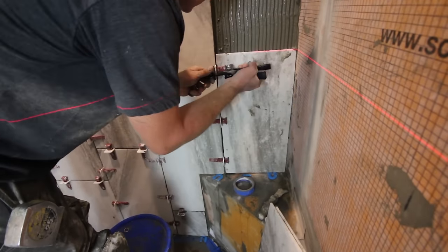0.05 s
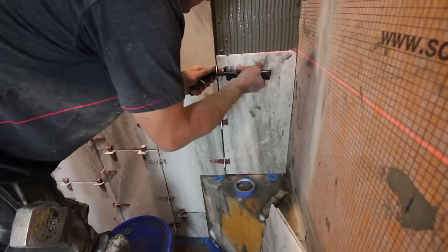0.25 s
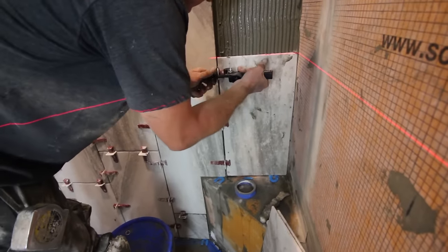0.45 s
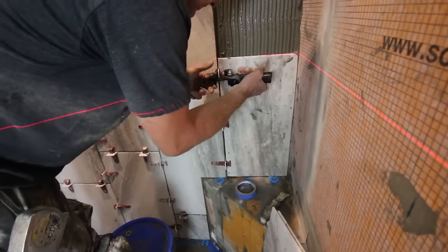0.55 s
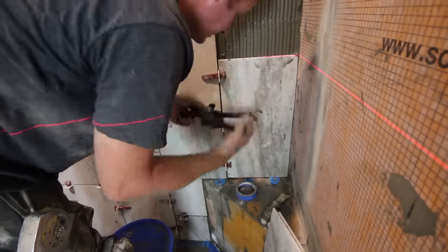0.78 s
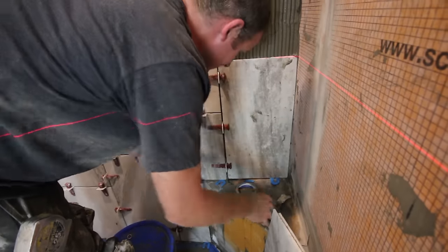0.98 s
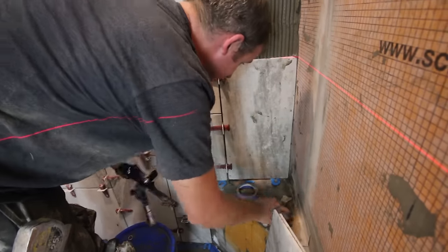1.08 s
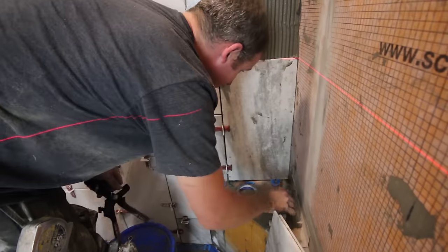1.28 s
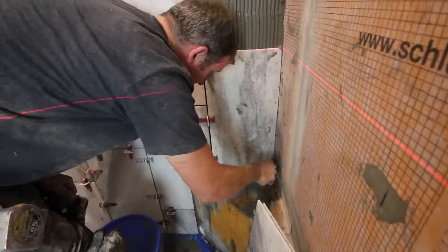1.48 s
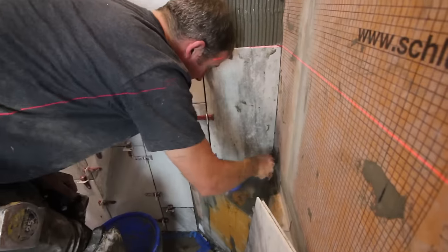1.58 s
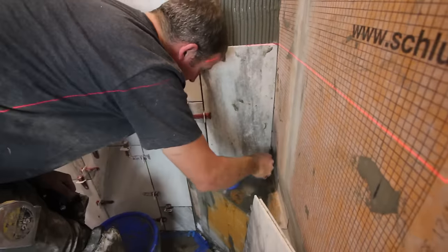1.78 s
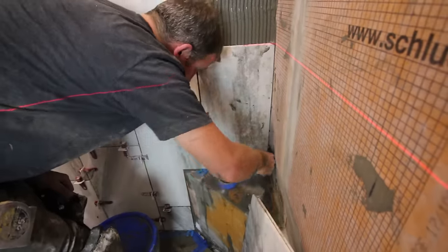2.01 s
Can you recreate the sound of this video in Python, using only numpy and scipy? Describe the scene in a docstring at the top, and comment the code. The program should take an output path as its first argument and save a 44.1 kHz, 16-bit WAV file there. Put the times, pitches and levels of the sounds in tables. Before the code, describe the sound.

Close to the microphone, a steel tool scrapes grittily between tiles with sharp clicks and a tiny squeak. A hand briefly rummages through hard bits, then hollow knocks and light clinks on tile follow, ringing in the tiled room.

```python
"""A steel hand tool clatters, scrapes, clinks and squeaks at a tile joint on a bathroom wall, close to
the microphone. After a pause a hand rummages among small hard pieces in a tray, then the tool knocks,
drags and clinks on a hollow tile. Each contact is a few milliseconds of crunching grit, treble first,
that rings short modes. The tiled room rings on behind, over faint room tone, and the loudest hits
overload the microphone."""
import sys
import numpy as np
from scipy import signal
from scipy.fft import rfft, irfft
from scipy.io import wavfile

SR = 44100
rng = np.random.default_rng(int(sys.argv[2]) if len(sys.argv) > 2 else 0)


def pcm_store(signal):
    """Save signal as 16-bit PCM."""
    levels = np.round(np.clip(np.atleast_2d(signal), -1, 1) * 32767)
    wavfile.write(sys.argv[1], SR, levels.astype(np.int16).T)


N = 90404

# spectrum of the room tone: (frequency [Hz], relative level [dB])
ROOM_TONE_SPECTRUM = [(30, 4), (341, -4), (546, -3), (1260, -4.5), (1820, -13.5), (2420, -11.5),
                      (15500, -30)]
# reverberation of the tiled room: (frequency [Hz], t60 [s], relative level [dB])
ROOM_DECAY = [(98, 0.38, -4.5), (405, 0.53, -3.5), (1540, 0.27, 2.5), (5190, 0.31, -0.5),
              (13380, 0.083, 1.5)]
# treble modes of the tool's steel: (frequency [Hz], gain [dB])
STEEL_MODES = [(4580, 1), (5400, -4.5), (6200, -13.5), (7200, -7.5), (7800, -3.5), (8650, -4.5),
               (11600, -2.5), (13800, -1.5), (14700, 0), (15650, 6)]
# light touches of the steel on the tile: (time [s], relative level [dB])
STEEL_CLINKS = [(1.532, -45.5), (1.559, -49), (1.605, -50), (1.635, -51), (1.647, -49), (1.655, -51),
                (1.697, -37), (1.887, -47), (1.892, -49), (1.906, -48), (2.01, -33), (2.016, -45),
                (2.03, -32)]
# modes of the tray, the hollow tile and the tool: (frequency [Hz], gain [dB], t60 [s])
TRAY_MODES = [(170, -8.5, 0.055), (354, -10, 0.077), (650, 6, 0.0203), (1000, 0, 0.018),
              (1410, -13.5, 0.00574), (2540, -6.5, 0.0153), (3570, 2.5, 0.017)]
TILE_MODES = [(160, 18.5, 0.077), (317, 16, 0.1435), (594, -1.5, 0.047), (1063, 2.5, 0.034),
              (1408, 5, 0.029), (2015, -6.5, 0.035), (2390, 3, 0.014), (3500, -9, 0.016),
              (4050, -1, 0.0044)]
TOOL_MODES = [(144, -3, 0.057), (271.7, -13.5, 0.052), (564.4, 5.5, 0.026), (1330, 18.5, 0.025),
              (1900, -7, 0.0061), (2355, 5, 0.028), (2692, 1.5, 0.025), (3290, -1, 0.028), (3856, 4, 0.019)]
# limits of the six bands of every contact and rub: (frequency [Hz])
BAND_EDGES_HZ = [70, 200, 430, 800, 1600, 4500, 16500]
# unresonant crunch beside the modes, band by band: (gain [dB])
CRUNCH_DB = [-8, -4, -3.5, -2.5, 1, 5.5]
# contacts: (time [s], level in each of the six bands over LEVEL_SPAN_S [dB], rise [s], decay [s])
TRAY_CONTACTS = [(1.056, -44, -58, -61.5, -57, -69, -65, 0.00081, 0.023),
                 (1.119, -67, -40.5, -42.5, -44.5, -57, -69, 0.00069, 0.016),
                 (1.152, -54, -66, -67, -36.5, -37.5, -53, 0.00065, 0.021),
                 (1.17, -63, -40.5, -40.5, -33.5, -45, -79, 0.001, 0.013),
                 (1.188, -50.5, -50, -46, -32, -38.5, -56, 0.00069, 0.01),
                 (1.215, -77, -55, -36, -34, -46, -66, 0.0033, 0.0054),
                 (1.243, -54, -36, -33, -23.5, -44, -44.5, 0.0015, 0.024),
                 (1.254, -64.5, -62, -27.5, -39, -27, -51, 0.0054, 0.015),
                 (1.282, -61, -68, -31, -31.5, -61, -48, 0.00054, 0.0054),
                 (1.293, -67.5, -43, -30, -34.5, -40, -68, 0.00077, 0.012)]
TILE_KNOCKS = [(1.5249, -43, -39.5, -25, -33.5, -22.5, -57, 0.00055, 0.0068),
               (1.541, -51.5, -34, -29.5, -50, -30.5, -74.5, 0.0004, 0.0084),
               (1.587, -36.5, -38, -29.5, -22, -24, -70, 0.00072, 0.012),
               (1.622, -65, -41, -34, -41, -32.5, -69, 0.00054, 0.0022),
               (1.66, -62, -65, -66, -63, -34, -65, 0.0026, 0.013),
               (1.6739, -30, -14.5, -23.5, -18, -27, -31.5, 0.0013, 0.0063),
               (1.719, -38, -54, -32.5, -31, -31, -78, 0.0018, 0.0037),
               (1.756, -73, -39, -41, -49, -35, -59, 0.00037, 0.007),
               (1.782, -71, -29, -36, -63, -43.5, -71, 0.00061, 0.01),
               (1.81, -42.5, -58, -33.5, -46, -44, -68, 0.0016, 0.0067),
               (1.823, -68, -33, -54, -38, -28, -54, 0.0019, 0.0027),
               (1.836, -44, -28.5, -27, -30.5, -37.5, -52, 0.00055, 0.0055),
               (1.844, -66, -61, -32, -34.5, -31.5, -45.5, 0.00085, 0.0074),
               (1.914, -51, -43, -46.5, -45, -40, -42, 0.00056, 0.0015),
               (1.933, -40, -29.5, -27, -29, -26, -33.5, 0.00074, 0.0039),
               (1.95, -48, -31.5, -46, -37, -35, -43, 0.00033, 0.0019),
               (2.043, -66, -53, -40, -43, -37, -35, 0.00078, 0.0066)]
TOOL_CLATTER = [(0.088, -19.5, -25, -31, -48.5, -47.5, -59.5, 0.00022, 0.011),
                (0.163, -38, -43.5, -58, -68, -49.5, -60, 0.00092, 0.0045),
                (0.175, -45, -40, -50, -76, -45, -53, 0.00035, 0.0057),
                (0.186, -57, -38.5, -52, -51, -37.5, -68, 0.004, 0.0064),
                (0.203, -49, -51, -45, -67, -51.5, -36.5, 0.0015, 0.015),
                (0.2314, -28.5, -23.5, -18.5, -20.5, -19, -25.5, 0.0012, 0.0056),
                (0.2617, -49, -26, -17, -13.5, -4.5, -10, 0.00088, 0.0033),
                (0.288, -51, -21.5, -29, -13, -20, -17.5, 0.00039, 0.011),
                (0.292, -33, -48, -21, -19, -24, -46, 0.001, 0.0026),
                (0.333, -43, -25, -28, -46, -24.5, -30, 0.0026, 0.0018),
                (0.337, -55, -51, -59, -19, -50, -25.5, 0.0005, 0.0067),
                (0.359, -56, -25.5, -32, -29, -57, -57, 0.0014, 0.013),
                (0.39, -31, -22, -21, -25.5, -25, -19.5, 0.0032, 0.0095),
                (0.417, -44, -35, -45, -32.5, -50, -45, 0.00072, 0.004),
                (0.444, -32, -22, -24, -61, -25.5, -20, 0.0021, 0.0087),
                (0.509, -58, -41, -52, -54, -29, -31, 0.0033, 0.015),
                (0.527, -46, -62, -55, -52, -36, -33.5, 0.0031, 0.013),
                (0.573, -72.5, -58, -45.5, -67, -69, -40, 0.00074, 0.0055),
                (0.597, -55, -39, -39, -54, -37.5, -33.5, 0.00078, 0.0068),
                (0.662, -67.5, -53, -59, -49.5, -47, -50.5, 0.00052, 0.0053)]
# rubbing between contacts: (time [s], level below 1600 Hz [dB], level above 1600 Hz [dB])
TRAY_RUB = [(1.04, -75, -65), (1.099, -60.5, -61), (1.163, -55, -54), (1.21, -53, -44), (1.24, -46, -54.5),
            (1.268, -44.5, -38.5), (1.311, -53.5, -48.5), (1.402, -67, -68)]
TILE_RUB = [(1.532, -49.5, -52), (1.581, -38, -46.5), (1.64, -51, -47), (1.7, -45, -39.5),
            (1.75, -59, -49.5), (1.8, -50, -56), (1.87, -47, -49.5), (1.92, -79, -45.5),
            (1.951, -48, -35.5), (2.05, -48.5, -41.5)]
JOINT_RUB = [(0.15, -79, -78), (0.191, -54, -49.5), (0.225, -56, -47.5), (0.28, -34, -33),
             (0.33, -40, -35.5), (0.38, -41.5, -40.5), (0.43, -33.5, -41), (0.49, -44, -39),
             (0.544, -49, -44), (0.6, -54, -48), (0.661, -60.5, -54.5), (0.75, -63.5, -63)]
# tone of the joint, the tray and the tile: (bass cut [Hz], treble roll-off [Hz])
TONE_HZ = [(78, 4700), (100, 3900), (125, 3100)]

STEEL_T60_CYCLES, STRIKE_SPREAD_DB = 85, 3
SNAP_DB, BASS_LAG_S, LEVEL_SPAN_S = 17, 0.0009, 0.009
CLUMP_DB, CLUMP_S = 2, 0.0048
RUB_RING_DB = [-21, -19.5]   # rubbing damps the modes (below, above 1600 Hz)


def from_db(db):
    """Decibels to gain."""
    return 10 ** (np.asarray(db) / 20)


def rms_one(x):
    """Scale to rms 1."""
    return x / np.sqrt(np.mean(x ** 2) + 1e-20)


def at_hz(table, hz, column=1):
    """Read a table on a log-frequency axis."""
    table = np.array(table)
    return np.interp(np.log(hz), np.log(table[:, 0]), table[:, column])


def room_tone():
    """Faint, steady background noise, strongest in the bass."""
    hz = np.maximum(np.arange(N // 2 + 1) * SR / N, 1)
    spectrum = rfft(rng.standard_normal(N)) * from_db(at_hz(ROOM_TONE_SPECTRUM, hz))
    return from_db(-58.5) * rms_one(irfft(spectrum, N))


def bathroom_reverb(direct, gap_s=0.0054):
    """Dense reflections off the tiles reach the microphone after a gap and die faster in the treble."""
    t, tail = np.arange(SR) / SR, 0
    for low in 60 * 2. ** np.arange(8):
        octave = signal.butter(2, [low, 2 * low], "band", fs=SR, output="sos")
        noise = signal.sosfilt(octave, rng.standard_normal(SR))
        hz = np.sqrt(2) * low
        tail = tail + noise * from_db(at_hz(ROOM_DECAY, hz, column=2) - 60 * t / at_hz(ROOM_DECAY, hz))
    return signal.fftconvolve(direct, tail * (t > gap_s) / np.sqrt(SR / 40))[:N]


def ring(force, hz, t60):
    """One decaying mode, driven by a force."""
    radius, angle = from_db(-60 / (max(t60, .002) * SR)), 2 * np.pi * hz / SR
    return signal.lfilter([0, np.sin(angle)], [1, -2 * radius * np.cos(angle), radius ** 2], force + 1e-18)


def grit(samples, per_s, spread_db):
    """Grains of uneven size breaking at random; rms 1."""
    sizes = from_db(spread_db * np.minimum(rng.exponential(1, samples), 4))
    signs = rng.choice([-1, 1], samples)
    return rms_one(sizes * signs * (rng.random(samples) < per_s / SR))


def body(modes, tone_hz, band, force, ring_db=0, spread_db=0):
    """One band of an object: grains crunch drily and ring its modes, unevenly if given a spread."""
    low, high = BAND_EDGES_HZ[band:band + 2]
    out = from_db(CRUNCH_DB[band]) * force * np.sqrt(SR / (high - low))
    for hz, db, t60 in modes:
        if low <= hz < high:
            gain = from_db(db + ring_db + spread_db * rng.standard_normal())
            out += gain * ring(force, hz, t60) / np.sqrt(t60 * SR / 28)
    filters = [signal.butter(2, [low, high], "band", fs=SR, output="sos"),
               signal.butter(4, tone_hz[0], "high", fs=SR, output="sos"),
               signal.butter(1, tone_hz[1], fs=SR, output="sos")]
    return (-1) ** band * signal.sosfilt(np.vstack(filters), out)


def rubbing(modes, tone_hz, levels, bass_db, treble_db):
    """Sliding breaks grit in clumps; bass_db and treble_db offset the two outer bands."""
    t, out = np.arange(N) / SR, np.zeros(N)
    clumps = np.interp(t / CLUMP_S, np.arange(2000), rng.standard_normal(2000))
    grains = rms_one(grit(N, per_s=9000, spread_db=1.5) * from_db(CLUMP_DB * clumps))
    times, low_db, high_db = np.transpose(levels)
    for band, db in enumerate([low_db + bass_db, low_db, low_db, low_db, high_db, high_db + treble_db]):
        if band == 5:   # loose crumbs tick in the top band
            grains = grains + from_db(-5) * grit(N, per_s=40, spread_db=1.5)
        ring_db = RUB_RING_DB[band // 4]
        response = body(modes, tone_hz, band, signal.unit_impulse(SR // 4), ring_db)
        force = grains * from_db(np.interp(t, times, db, -120, -120))
        out += body(modes, tone_hz, band, force, ring_db) / np.linalg.norm(response)
    return out


def strikes(modes, tone_hz, contacts):
    """Each contact crushes grit, peaks in one hard snap and rings the object, the low bands last."""
    age, out = np.arange(SR // 6) / SR, np.zeros(N + SR)
    for start, *levels, rise, decay in contacts:
        envelope = np.minimum(age / rise, 1) ** 2 * np.exp(-(np.maximum(age - rise, 0) / decay) ** 2)
        crunch = grit(len(age), per_s=7700, spread_db=4) * envelope
        crunch[int(rise * SR)] = from_db(SNAP_DB)
        for band, db in enumerate(levels):
            at = int((start + BASS_LAG_S * max(4 - band, 0)) * SR)
            sound = body(modes, tone_hz, band, crunch, spread_db=STRIKE_SPREAD_DB)
            gain = from_db(db) * np.sqrt(LEVEL_SPAN_S * SR) / np.linalg.norm(sound)
            out[at:at + len(age)] += gain * sound
    return out[:N]


def tray_rummage():
    """Small hard pieces slide and knock in a tray under a hand."""
    slide = rubbing(TRAY_MODES, TONE_HZ[1], TRAY_RUB, bass_db=-36, treble_db=-12.5)
    return slide + strikes(TRAY_MODES, TONE_HZ[1], TRAY_CONTACTS)


def steel_modes():
    """The steel sings whatever it touches, each mode for the same number of cycles."""
    return [(hz, db, STEEL_T60_CYCLES / hz) for hz, db in STEEL_MODES]


def steel_clinks(soft_hz=9000):
    """Slightly soft touches on the tile ring the steel's modes unevenly."""
    out = np.zeros(N)
    times, level_db = np.transpose(STEEL_CLINKS)
    uneven_db = STRIKE_SPREAD_DB * rng.standard_normal((len(times), len(STEEL_MODES)))
    for k, (hz, db, t60) in enumerate(steel_modes()):
        taps = np.zeros(N)
        taps[(times * SR).astype(int)] = from_db(level_db + db + uneven_db[:, k])
        out += ring(taps, hz, t60)
    return signal.sosfilt(signal.butter(2, soft_hz, fs=SR, output="sos"), out)


def steel_squeak(start_s=0.203, decay_s=0.009):
    """The tool gives one short, high squeak."""
    age = np.arange(N) / SR - start_s
    squeak = rms_one(ring(rng.standard_normal(N), hz=11540, t60=0.0027))
    return from_db(-31) * squeak * (age > 0) * np.exp(-np.abs(age) / decay_s)


def hollow_tile():
    """The tool drags and knocks on a hollow tile, ringing tile and steel."""
    modes = TILE_MODES + steel_modes()
    drag = rubbing(modes, TONE_HZ[2], TILE_RUB, bass_db=-7.5, treble_db=-11)
    return drag + strikes(modes, TONE_HZ[2], TILE_KNOCKS)


def tool_at_joint():
    """The tool scrapes and clatters at the tile joint, ringing its own modes."""
    modes = TOOL_MODES + steel_modes()
    scrape = rubbing(modes, TONE_HZ[0], JOINT_RUB, bass_db=0, treble_db=-1.5)
    return scrape + strikes(modes, TONE_HZ[0], TOOL_CLATTER)


def scene():
    """One microphone close to the work, the bathroom behind it."""
    close = tool_at_joint() + tray_rummage() + hollow_tile() + steel_clinks() + steel_squeak()
    return (close + from_db(-7) * bathroom_reverb(close) + room_tone())[None]


def record(dry):
    """The microphone clips the peaks and loses the deepest bass and the very top."""
    bass_cut = signal.butter(2, 45, "high", fs=SR, output="sos")
    top_cut = signal.cheby2(24, 50, 16050, fs=SR, output="sos")
    overloaded = np.clip(dry, -1, 1)
    return np.clip(signal.sosfilt(np.vstack([bass_cut, top_cut]), overloaded), -1, 1)


dry = scene()
out = record(dry)
pcm_store(out)
```